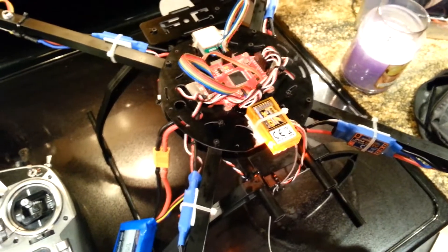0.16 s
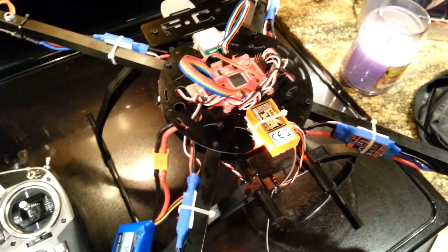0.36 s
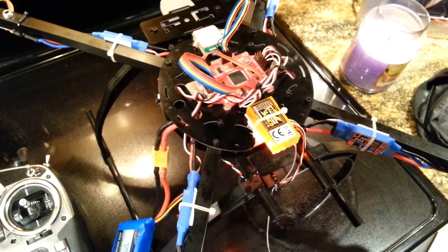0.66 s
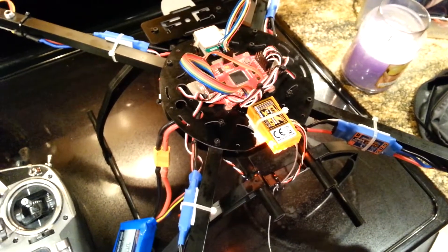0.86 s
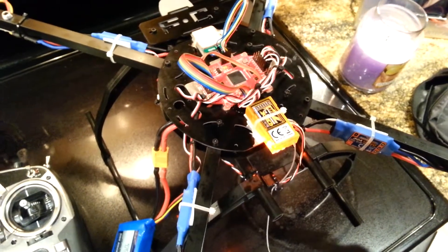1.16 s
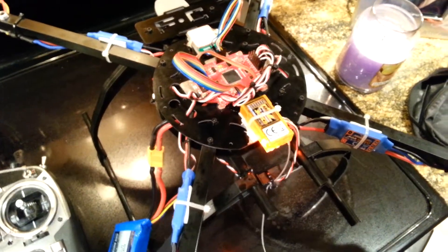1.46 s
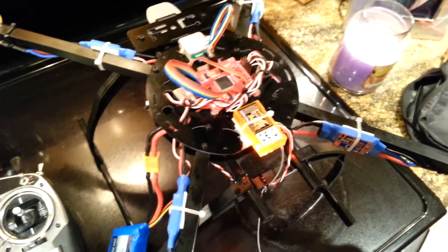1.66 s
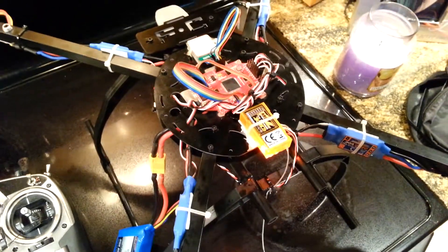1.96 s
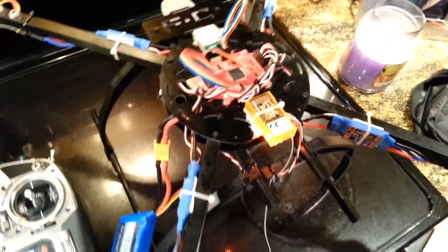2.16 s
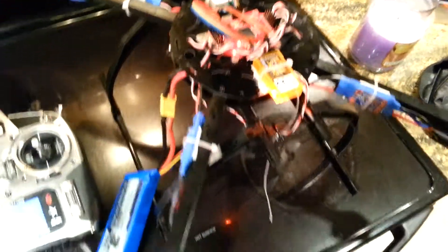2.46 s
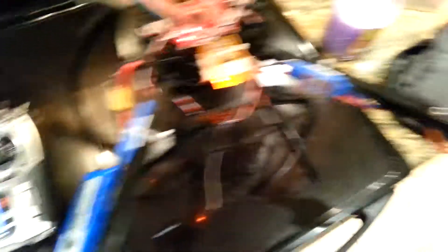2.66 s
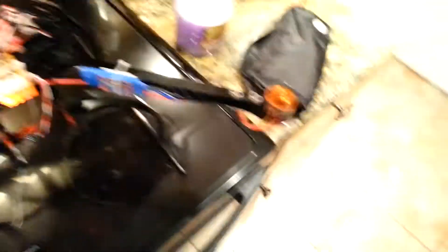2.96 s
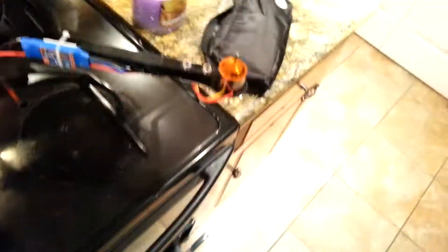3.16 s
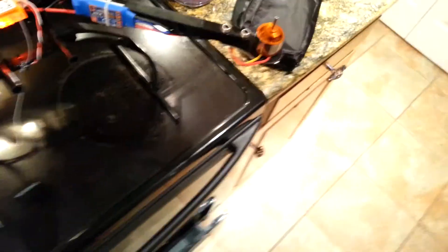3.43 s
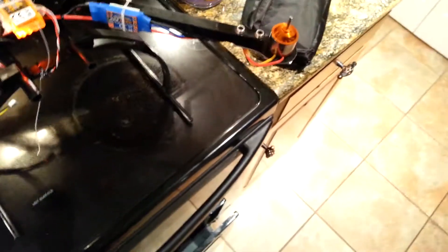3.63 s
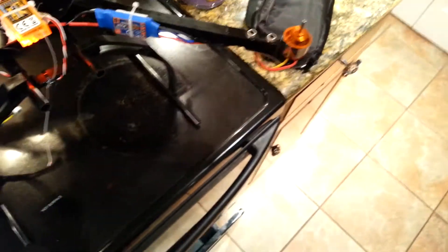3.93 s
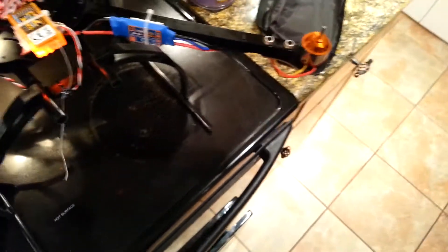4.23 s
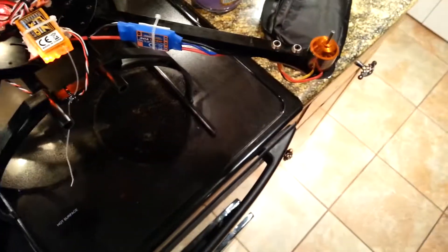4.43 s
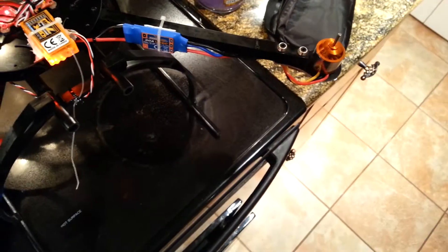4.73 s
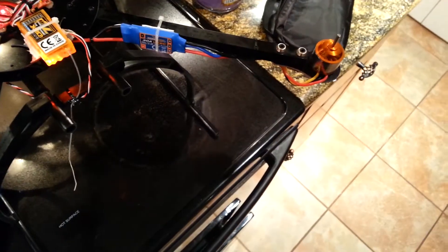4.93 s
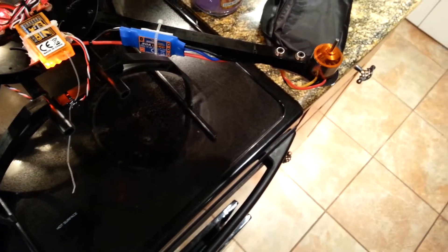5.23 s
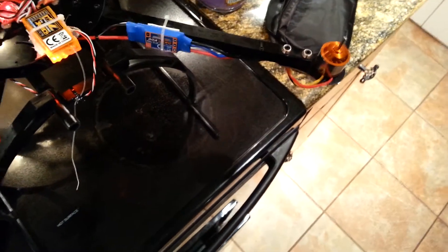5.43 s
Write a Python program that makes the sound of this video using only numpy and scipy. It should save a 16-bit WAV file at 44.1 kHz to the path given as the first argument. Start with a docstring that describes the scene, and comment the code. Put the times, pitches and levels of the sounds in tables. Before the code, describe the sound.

Small bare electric motors spin up and whine at clashing high pitches over a piercing steady squeal, while another stutters and finally joins in.

```python
"""Bare drone motors on a kitchen hob

A quadcopter without propellers is armed on a kitchen hob, heard in stereo from a hand-held microphone.
Three small brushless motors (one steady, one wandering, one climbing) ring the frame at their rotation orders.
The fourth makes false starts, stutters in bursts of knocks and sings along late.
Three controllers' switching tones near 7.7 kHz sag with motor speed and beat; bearing noise hisses below them."""
import sys
import numpy as np
from scipy import signal
from scipy.io import wavfile
from scipy.ndimage import uniform_filter1d

SR = 44100
rng = np.random.default_rng(int(sys.argv[2]) if len(sys.argv) > 2 else 0)


def store_wav(level_fs):
    """Save 16-bit WAV to argv[1]."""
    pcm = np.round(np.clip(np.atleast_2d(level_fs), -1, 1) * 32767)
    wavfile.write(sys.argv[1], SR, pcm.T.astype(np.int16))


N = 246519
TIME = np.arange(N) / SR
MAGNET_PAIRS = 7
STEP = 64  # samples between points of the slower control curves


def from_db(db):
    """Decibels to gain."""
    return 10 ** (np.asarray(db) / 20)


def rms_one(x):
    """Scale to unit rms."""
    return x / np.sqrt(np.mean(x ** 2) + 1e-20)


def in_time(rows):
    """Each column of a timed curve, interpolated at every sample."""
    s, *columns = np.transpose(rows)
    return [np.interp(TIME, s, column) for column in columns]


def at_hz(points, hz):
    """Read a spectrum on a log-frequency axis."""
    points = np.array(points)
    return np.interp(np.log(hz), np.log(points[:, 0]), points[:, 1])


def drift(rate):
    """Smooth random motion of unit rms; a higher rate moves faster."""
    pole = np.exp(-80 * np.pi * rate / SR)
    # computed at every 40th sample, after a run-in of 2000 points
    noise = rng.standard_normal(N // 40 + 2002)
    slow = signal.lfilter([1], [1, -2 * pole, pole * pole], noise)[2000:]
    return np.interp(np.arange(N) / 40, np.arange(len(slow)), rms_one(slow))


def band(x, low, high):
    """Butterworth band-pass."""
    sos = signal.butter(2, [low, min(high, .45 * SR)], "band", fs=SR, output="sos")
    return signal.sosfilt(sos, x)


def angle(hz):
    """Running phase [rad] of a frequency curve."""
    return 2 * np.pi * np.cumsum(hz) / SR


def swelling_force(events):
    """Each event rises to its peak half its length after onset, then dies away."""
    force = np.zeros(N)
    for s, db, length in events:
        age = np.maximum(TIME - s, 0) / max(length / 2, 1e-3)
        force += from_db(db) * age * np.exp(1 - age)
    return force


# balance between the microphone's two sides: (frequency [Hz], left minus right [dB])
LEFT_MINUS_RIGHT = [(60, -13), (130, -7), (290, -2), (640, 4), (1410, 5.5), (3100, 6.5), (6820, -2.5),
                    (9500, 4.5), (15000, -4.5)]


def lean(hz):
    """Left and right gains at this pitch."""
    return from_db(at_hz(LEFT_MINUS_RIGHT, hz) * np.array([[.5], [-.5]]))


def partial(phase, gain, hz, fade_db=1.42, fade_rate=2.3):
    """A sine in two ears; room standing waves sway its level and set the ears' phases apart, more in the treble."""
    shortness = min(hz / 2500, 1.1)
    apart = rng.choice([-1, 1]) * rng.uniform(0.62, 1) * shortness
    ears = rng.uniform(0, 2 * np.pi) + np.array([[apart], [-apart]])
    wave = np.sin(((phase % (2 * np.pi)) + ears).astype(np.float32))
    sway = from_db(fade_db * shortness * drift(fade_rate))
    return np.sqrt(2) * gain * sway * lean(hz) * wave


START_SPEED, ROTOR_LAG_S = 60, .15  # turns per s, s
# speed asked of each motor: (time [s], speed [turns per s])
STEADY_ASKED = [(0, 82.3), (5.12, 82.8), (5.18, 85), (5.35, 83)]
WANDERING_ASKED = [(0, 83), (.62, 91.4), (1.2, 93.9), (1.65, 92.1), (2.0, 92.1), (2.93, 85.1), (3.53, 88.1),
                   (4.07, 88.2), (4.64, 84.3), (4.9, 104)]
CLIMBING_ASKED = [(0, 60), (.09, 100), (.3, 103.5), (.41, 110), (1.02, 118), (1.11, 114.2), (1.49, 120),
                  (2.84, 136.3), (4.66, 148.5), (4.8, 161.5), (5.0, 159.5), (5.59, 163.5)]
LATE_ASKED = [(3.05, 80.5), (3.34, 38), (4.27, 39.7), (4.86, 112.5), (5.4, 116), (5.5, 127)]


def spin(throttle):
    """Turns per second: the rotor's inertia makes it trail the throttle."""
    asked, = in_time(throttle)
    keep = np.exp(-1 / (ROTOR_LAG_S * SR))
    return START_SPEED + signal.lfilter([1 - keep], [1, -keep], asked - START_SPEED)


# each motor's loudness: (time [s], relative hum level [dB], relative whine level [dB])
STEADY_LEVELS = [(0, -37, -4), (0.28, 2.5, 7.5), (0.7, -2.5, 3.5), (1.3, -3, 5.5), (2.0, -0.5, 5.5),
                 (2.6, -6.5, 3.5), (3.149, 6, -1), (3.9, 2.5, -6), (4.8, 3.5, -2.5), (5.59, 2, -2.5)]
WANDERING_LEVELS = [(0, 1, -1), (0.25, -9, -5), (0.45, 3, -2.5), (1.0, -2.5, -2), (2.6, 4.5, 0),
                    (3.15, 4, -4), (3.9, 2, -2), (4.65, 5, 2), (4.95, -0.5, 0.5), (5.59, 7, -14)]
CLIMBING_LEVELS = [(0, -5.5, -5), (0.299, 4.5, -1.5), (1.0, 9, 1.5), (1.9, 7.5, 7), (2.6, 11, 4),
                   (3.15, 4.5, 5), (4.5, 7.5, 9), (5.05, 9, 5), (5.59, 10.5, 4.5)]
LATE_LEVELS = [(4.55, -63, -51), (4.75, -11, -23), (5.1, 21.5, 7.5), (5.59, 18, -9)]
# each motor's partials: (multiple of the turning rate [1], relative level [dB])
STEADY_PARTIALS = [(13, -40), (14, -46), (18, -38), (21, -38.5), (28, -45.5), (35, -49.5), (36, -41.5),
                   (42, -31), (52, -54), (56, -53.5), (59, -59.5), (63, -43.5), (70, -41), (73, -50),
                   (84, -55), (136, -69)]
WANDERING_PARTIALS = [(13, -36.5), (14, -51.5), (21, -62), (28, -41), (36, -41.5), (42, -36.5), (45, -54),
                      (49, -46), (52, -45), (53, -53), (56, -45.5), (63, -47.5), (70, -58), (84, -49)]
CLIMBING_PARTIALS = [(1, -86.5), (2, -92), (8, -61), (12, -43.5), (13, -39.5), (14, -40), (21, -39.5),
                     (28, -38.5), (31, -54), (32, -60.5), (35, -55), (37, -50), (42, -39.5), (48, -52.5),
                     (49, -59), (56, -58.5), (63, -53.5), (84, -57)]
LATE_PARTIALS = [(13, -38.5), (14, -45.5), (21, -42), (26, -33.5), (28, -42), (35, -47), (42, -61.5),
                 (49, -45), (56, -49)]
# partials that meet a sharp mode of their arm and sing out, or dip where the boost is negative:
# (multiple of the turning rate [1], time of the extreme [s], width [s], boost [dB])
STEADY_MODES = [(42, 0.17, 0.06, 8.5), (35, 0.18, 0.2, 20), (63, 4.4, 1.9, 13), (36, 3.88, 1.02, 12.5),
                (56, 4.36, 1.45, 18), (73, 4.2, 0.57, 5), (63, 0.22, 0.16, -17), (63, 5.3, 0.11, 8.5),
                (42, 1.56, 0.76, 2)]
WANDERING_MODES = [(56, 0.53, 0.07, 11), (52, 1.177, 0.14, 10), (52, 1.8, 0.5, 7.5), (56, 2.65, 0.19, 8),
                   (56, 4.94, 0.26, 0), (42, 1.5, 0.72, 12), (42, 2.8, 0.25, -2), (42, 5.71, 0.18, 6),
                   (45, 5.25, 0.2, 7), (36, 0.4, 0.34, 15), (49, 3.95, 0.21, 6), (52, 3.7, 0.45, 6)]
CLIMBING_MODES = [(63, 0.12, 0.025, 18.5), (56, 0.15, 0.035, 30), (13, 0.17, 0.067, 10),
                  (37, 0.166, 0.057, 35), (37, 0.56, 0.22, 19), (49, 0.24, 0.14, 28), (28, 0.45, 0.14, 9),
                  (42, 0.5, 0.13, 5), (42, 1.12, 0.4, -21), (13, 2.1, 0.7, 1), (14, 1.3, 1.3, -12),
                  (35, 0.23, 0.15, 14), (35, 2.526, 0.18, 24.5), (35, 3.84, 0.3, 2), (31, 3.4, 0.39, 17),
                  (32, 4.13, 0.48, 23.5), (28, 4.83, 0.07, 15), (1, 4.4, 1.33, 21), (2, 5.16, 0.31, 28),
                  (28, 4.05, 0.23, 4.5), (28, 5.34, 0.37, -9), (31, 5.1, 0.73, -16), (32, 4.2, 0.12, -7),
                  (42, 5.55, 0.2, 2)]
# how well the frame radiates, also used for the mirror partials: (frequency [Hz], relative level [dB])
FRAME_RADIATION = [(110, -38), (160, 13.5), (800, -14), (1150, 0), (1400, -16.5), (2500, -7), (3400, -2.5),
                   (3900, -7.5), (4300, 6.5), (4650, 13.5), (4950, 18), (5400, -9.5), (7000, 8.5),
                   (14500, -4)]


def motor(speed, level_curve, orders, swells, level_db, unsteadiness, strain=0.00701, ripple_db=-58,
          wobble=0.086, flutter_db=0.73, strain_flutter_db=4.5, hum_waver_db=3.0):
    """Magnets and commutation steps ring the frame at multiples of the turning rate; also gives the rotor angle."""
    hum, whine = from_db(in_time(level_curve))
    # the rotor runs roughly while its speed changes
    relative_change = np.abs(np.gradient(speed)) * SR / speed
    pull = np.tanh(uniform_filter1d(relative_change, SR // 10))
    rotor = angle(speed * (1 + (unsteadiness + strain * pull) * drift(35.4)))
    # the bell runs slightly off centre, so the whine throbs once a turn and splits into close lines
    whine = whine * (1 + wobble * np.cos(rotor + drift(7.1)))
    flutter = drift(23)[::STEP]
    # other multiples of the magnet pairs add faint lines: the fine grain of the whine
    named = [order for order, db in orders]
    ripple = [(order, ripple_db - 4 * np.log2(order / 63) + rng.normal(0, 2))
              for order in MAGNET_PAIRS * np.arange(5, 19) if order not in named]
    out = np.zeros((2, N))
    for order, db in list(orders) + ripple:
        hz = order * speed[::STEP]
        boost = sum(up * np.exp(-((TIME[::STEP] - s) / width) ** 2)
                    for swelling, s, width, up in swells if swelling == order)
        # the lowest orders waver; the others flutter as the speed changes, the whine at all times
        if order < MAGNET_PAIRS:
            depth = hum_waver_db
        else:
            depth = flutter_db * (order > 20) + strain_flutter_db * pull[::STEP]
        # each partial reads the flutter from its own starting point
        shaken = depth * np.roll(flutter, rng.integers(len(flutter)))
        radiated_db = level_db + db + boost + shaken + at_hz(FRAME_RADIATION, hz)
        radiated = np.repeat(from_db(radiated_db), STEP)[:N]
        out += partial(order * rotor, radiated * (hum if order < 20 else whine), hz.mean())
    return out, rotor


# the fourth motor's brief false starts and run-downs:
# (onset [s], length [s], first speed [turns per s], last speed [turns per s], relative level [dB])
CHIRPS = [(0.0, .11, 61, 74, -33), (2.03, .13, 67, 77, -35), (2.16, .09, 76, 69, -39),
          (2.31, .1, 71, 57, -41), (2.97, .1, 66, 76, -37)]


def false_starts(orders=((14, -7), (42, 1), (84, -1))):
    """The fourth motor catches for a moment, its orders (multiple, dB) chirping up or running down."""
    out = np.zeros((2, N))
    for s, length, first, last, db in CHIRPS:
        progress = np.clip((TIME - s) / length, 0, 1)
        rotor = angle(first + (last - first) * np.sin(progress * np.pi / 2))
        gain = from_db(db) * np.sqrt(np.abs(np.sin(np.pi * progress)))
        for order, order_db in orders:
            out += partial(order * rotor, gain * from_db(order_db), order * last)
    return out


# bearing noise: (time [s], relative rumble level [dB], relative rattle level [dB], relative hiss level [dB])
BEARING_LEVELS = [(.05, -44.5, -39.5, -32.5), (.14, -45.5, -39.5, -29.5), (.7, -50, -44, -38),
                  (2.1, -47.5, -40.5, -36.5), (2.7, -47, -42.5, -38), (3.9, -47.5, -42, -32),
                  (4.65, -49.5, -40, -34), (5.1, -46, -36, -30.5)]
# spectrum of the rolling noise: (frequency [Hz], relative level per Hz [dB])
ROLLING_COLOUR = [(100, -65), (150, -39.5), (235, -26.5), (295, -30), (370, -28), (470, -28), (590, -34.5),
                  (740, -26), (1050, -21.5), (1630, -23.5), (3380, -16.5), (3900, -17.5), (4710, -9),
                  (5930, -12.5), (7470, -18.5), (9400, -17.5), (11900, -25), (14900, -24)]
# how alike the two sides are, before a fade to nothing at 3 kHz: (frequency [Hz], correlation [1])
LEFT_RIGHT_LIKENESS = [(60, -0.29), (180, 0.53), (550, 0.027), (1650, -0.88), (4970, 0.46), (15000, 0.87)]


def bearings(rotor, rumble_db=-5.5, rattle_db=-2.5, hiss_db=-5.5, patchy_db=2.0, lumpy_db=4.5, throb=0.045):
    """Rolling noise in third octaves; the rattling middle swells once a turn."""
    rumble, rattle, hiss = in_time(BEARING_LEVELS)
    edges = 104 * 2 ** (np.arange(23) / 3)
    white = rng.standard_normal((2, 2, N))
    # each zone's level is set over this range [Hz]
    zones = [(rumble + rumble_db, 200, 900), (rattle + rattle_db, 2000, 2700), (hiss + hiss_db, 5500, 7300)]
    levels = []
    for db, low, high in zones:
        colour_power = np.sum(from_db(at_hz(ROLLING_COLOUR, np.arange(low, high))) ** 2)
        levels.append(db - 10 * np.log10(colour_power))
    swell = 1 + throb * np.cos(rotor + drift(28))
    out = 0
    for k, (low, high) in enumerate(zip(edges, edges[1:])):
        hz = np.sqrt(low * high)
        zone = int(hz > 1000) + int(hz > 4500)
        mid, side = rms_one(band(white[k % 2], low, high))
        alike = np.clip(at_hz(LEFT_RIGHT_LIKENESS, hz) * (1 - hz / 3000), 0, 1)
        uneven_db = (patchy_db if zone else lumpy_db) * drift(10.0)
        gain = np.sqrt(high - low) * from_db(levels[zone] + at_hz(ROLLING_COLOUR, hz) + uneven_db)
        noise = np.sqrt(1 + alike) * mid + np.sqrt(1 - alike) * side * [[1], [-1]]
        out = out + gain * lean(hz) * noise * (swell if zone == 1 else 1)
    return out


def ball_tones(rotor, low_db=-57, high_db=-57, fade_s=3.4):
    """Balls hum at fractional multiples of the turning rate, strongest while the microphone is over that motor."""
    near = np.clip((fade_s - TIME) / .4, .25, 1) * np.clip(TIME / .3, 0, 1)
    low = partial(4.5 * rotor, from_db(low_db), 370)
    high = partial(9.65 * rotor, from_db(high_db), 800)
    return near * (low + high)


# bearing hums of the climbing motor:
# (multiple of the turning rate [1], loudest at [s], width [s], relative level [dB])
CLIMBING_BALL_HUMS = [(4.5, 1.16, 1.7, -57.5), (2.62, 2.6, 0.61, -57), (3.62, 7.76, 2.6, -50.5),
                      (2.62, 5.38, 0.33, -54.5)]


def ball_hums(rotor, waver_db=5.5):
    """Wavering hums of a bearing's balls swell and fade as its motor climbs."""
    out = 0
    for order, s, width, db in CLIMBING_BALL_HUMS:
        gain = from_db(db + waver_db * drift(12.7)) * np.exp(-((TIME - s) / width) ** 2 / 2)
        out = out + partial(order * rotor, gain, 410)
    return out


# switching rates at rest [Hz], the fourth controller's clock running fast; sag [Hz for each turn per s]
IDLE_HZ, LATE_IDLE_HZ, SAG_HZ_PER_SPEED = 7810, 7833, .85


def switching(speed, idle_hz, jitter):
    """Phase of a controller's switching: its rate sags as the motor speeds up, shakier at low speed."""
    steady_phase = angle(idle_hz - SAG_HZ_PER_SPEED * speed)
    return steady_phase + jitter * START_SPEED / speed * drift(45)


SWITCH_ON_S, LATE_ON_S = 0.0575, 2  # when the switching tones set in
# each switching tone at the moving microphone: (time [s], relative left level [dB], relative right level [dB])
STEADY_TONE = [(.06, -16.5, -19), (.38, -10.5, -20), (.78, -22, -21.5), (1.42, -9.5, -24),
               (1.58, -19.5, -24), (1.82, -11, -24.5), (2.54, -12.5, -18.5), (2.62, -23, -24),
               (3.501, -17, -18), (3.58, -10, -42), (4.3, -22.5, -15), (5.59, -54, -64)]
CLIMBING_TONE = [(.14, -25, -19), (.7, -40, -24.5), (2.22, -39, -16), (2.38, -15, -58), (2.78, -23.5, -27),
                 (2.94, -16, -22), (3.18, -38, -37), (3.42, -42, -12.5), (4.06, -19, -29),
                 (4.78, -13.5, -16), (5.59, -32, -15)]
LATE_TONE = [(3.05, -42, -44), (3.69, -27, -22.5), (4.17, -26, -27), (4.25, -18, -23), (4.33, -25.5, -25.5),
             (4.73, -17.5, -18.5), (5.59, -16.5, -31)]


def squeal(phase, loudness, on_s, level_db, port_phase, fade_db=2.5, fade_rate=9.9):
    """The windings sing at the switching rate once powered; standing waves sway each ear's level."""
    powered = np.clip((TIME - on_s) / 0.0011, 0, 1)
    sway_db = fade_db * np.array([drift(fade_rate), drift(fade_rate)])
    ears_db = np.array(in_time(loudness)) + sway_db
    wave = np.sin(phase + np.array([[0], [port_phase]]))  # right side leads by port_phase [rad]
    return np.sqrt(2) * powered * from_db(level_db + ears_db) * wave


MIRRORS_RISE_S = 0.35  # the mirror partials grow as the rotors come up to speed
# mirror partials: (multiple of the switching rate [1], plus this multiple of the turning rate [1],
# relative level [dB], loudest at [s], width [s])
STEADY_SIDEBANDS = [(1, -35, -55, 4.6, 1.4), (1, -21, -46, 2.2, 4), (1, -14, -55, 4.5, 3.6),
                    (1, 14, -60, 3.5, 4.8), (1, 28, -68, 2.5, 4), (1, 42, -60, 2.5, 4),
                    (1, 70, -58, 2.5, 4), (2, -63, -88, 2.5, 4), (2, -42, -43.5, 2.5, 4.7),
                    (2, -21, -52, 2.5, 4), (2, -14, -50, 1, 2)]
WANDERING_SIDEBANDS = [(1, -35, -48, 1.4, 0.94), (1, -21, -56, 2.3, 4), (1, -14, -48, 3.4, 4),
                       (1, 14, -45.5, 3.2, 7.6), (1, 42, -46, 3.6, 4.5), (2, -63, -55, 2.5, 4),
                       (2, -42, -60, 2.5, 4), (2, -21, -58, 2.5, 4), (2, -14, -38, 2.5, 4)]
CLIMBING_SIDEBANDS = [(1, -42, -38.5, 0.83, 1.2), (1, -21, -56, 4.2, 1.8), (1, -14, -43.5, 2.2, 3.2),
                      (1, 14, -42.5, 4.3, 3.8), (1, 35, -63, 2.5, 4), (1, 42, -44.5, 1.3, 3),
                      (2, -63, -53, 2.5, 4), (2, -42, -49, 5.1, 4), (2, -21, -64, 2.5, 4),
                      (2, -14, -44, 2.5, 4.5)]


def sidebands(carrier, rotor, mirrors):
    """Commutation chops the switching tone and its octave into mirror partials that glide with motor speed."""
    out = 0
    for octave, order, db, s, width in mirrors:
        phase = octave * carrier + order * rotor
        hz = np.maximum(np.gradient(phase[::STEP]) * SR / (2 * np.pi * STEP), 1)
        swell = np.exp(-((TIME[::STEP] - s) / width) ** 2 / 2)
        gain = from_db(db + at_hz(FRAME_RADIATION, hz)) * swell
        out = out + partial(phase, np.repeat(gain, STEP)[:N], hz.mean())
    return out * np.clip(TIME / MIRRORS_RISE_S, 0, 1) ** 2


# the fourth motor's kicks: (onset [s], relative peak level [dB], length, twice the rise time [s])
ROTOR_KICKS = [(0.064, -13.5, 0.069), (0.113, -25, 0.048), (0.128, -26, 0.052), (1.873, -12.5, 0.031),
               (2.009, -15.5, 0.075), (2.137, -18.5, 0.081), (2.801, -17, 0.028), (2.94, -13.5, 0.053),
               (3.062, -20, 0.074), (3.156, -19.5, 0.032), (4.67, -17, 0.072)]


def stutter(level_db=-9.0, knocks_per_s=700, ring_db=-2.5, ring_hz=3000):
    """The stalled rotor judders: each kick is a flurry of small knocks in the bell and arm."""
    force = swelling_force(ROTOR_KICKS)
    knocks = (rng.random(N) < knocks_per_s / SR) * rng.uniform(0.61, 1, N)
    age = np.arange(SR // 50) / SR
    arm = rng.standard_normal((2, len(age))) * np.exp(-age / 0.0098)
    shaken = signal.fftconvolve(knocks[None], arm, axes=1)[:, :N]
    broad = rms_one(band(shaken, 1500, 6000))
    ring = rms_one(band(shaken, .75 * ring_hz, 1.3 * ring_hz))
    body = broad + from_db(ring_db) * ring
    return from_db(level_db) * force * rms_one(body) * lean(ring_hz)


# soft bumps of the hand that holds the microphone:
# (onset [s], relative peak level [dB], length, twice the rise time [s])
HAND_BUMPS = [(1.767, -63, 0.044), (2.213, -63, 0.022), (3.192, -57, 0.033)]


def bumps(low_hz=55, high_hz=130):
    """Each bump of the hand on the microphone is a dull swell of low noise."""
    rumble = rms_one(band(rng.standard_normal(N), low_hz, high_hz))
    return swelling_force(HAND_BUMPS) * rumble * lean(low_hz)


KITCHEN_T60_S, KITCHEN_DB = 0.45, -11.5  # decay time, echo level relative to the direct sound


def kitchen(x):
    """The room holds each pitch a moment longer, so gliding whines beat against their own echoes."""
    age = np.arange(SR // 3) / SR
    tail = rng.standard_normal((2, len(age))) * from_db(-60 * age / KITCHEN_T60_S)
    tail = band(tail, 600, 12000)
    tail /= np.sqrt(np.sum(tail ** 2, axis=1, keepdims=True))
    return x + from_db(KITCHEN_DB) * signal.fftconvolve(x, tail, axes=1)[:, :N]


def scene():
    """Motors, controllers and bearings sound together in the kitchen."""
    steady_speed, wandering_speed = spin(STEADY_ASKED), spin(WANDERING_ASKED)
    climbing_speed, late_speed = spin(CLIMBING_ASKED), spin(LATE_ASKED)
    steady, steady_rotor = motor(
        steady_speed, STEADY_LEVELS, STEADY_PARTIALS, STEADY_MODES,
        level_db=-2.0, unsteadiness=0.00045, ripple_db=-64, wobble=0.15)
    wandering, wandering_rotor = motor(
        wandering_speed, WANDERING_LEVELS, WANDERING_PARTIALS, WANDERING_MODES,
        level_db=0.5, unsteadiness=0.0011)
    climbing, climbing_rotor = motor(
        climbing_speed, CLIMBING_LEVELS, CLIMBING_PARTIALS, CLIMBING_MODES,
        level_db=-3.0, unsteadiness=0.00106, ripple_db=-74)
    late, _ = motor(late_speed, LATE_LEVELS, LATE_PARTIALS, [], level_db=-2.0, unsteadiness=0.00904)

    steady_switch = switching(steady_speed, IDLE_HZ, jitter=0.044)
    wandering_switch = switching(wandering_speed, IDLE_HZ, jitter=0.04)
    climbing_switch = switching(climbing_speed, IDLE_HZ, jitter=0.026)
    late_switch = switching(late_speed, LATE_IDLE_HZ, jitter=0.2)
    squeals = squeal(steady_switch, STEADY_TONE, SWITCH_ON_S, level_db=-1.0, port_phase=1.93)
    squeals += squeal(climbing_switch, CLIMBING_TONE, SWITCH_ON_S, level_db=-1.5, port_phase=1.43)
    squeals += squeal(late_switch, LATE_TONE, LATE_ON_S, level_db=4.0, port_phase=0.39)
    mirrors = sidebands(steady_switch, steady_rotor, STEADY_SIDEBANDS)
    mirrors += sidebands(wandering_switch, wandering_rotor, WANDERING_SIDEBANDS)
    mirrors += sidebands(climbing_switch, climbing_rotor, CLIMBING_SIDEBANDS)

    rolling = bearings(climbing_rotor) + ball_tones(steady_rotor) + ball_hums(climbing_rotor)
    motors = steady + wandering + climbing + late
    whines = kitchen(motors + mirrors * (TIME > SWITCH_ON_S) + false_starts())
    return whines + squeals + rolling + stutter() + bumps()


CUTOFF_HZ = 14600


def record(dry):
    """The highest peaks are rounded, the bass is shed and the top is cut."""
    rounded = dry / (1 + (dry / .95) ** 8) ** (1 / 8)
    thin = signal.sosfilt(signal.butter(2, 110, "high", fs=SR, output="sos"), rounded)
    return signal.sosfilt(signal.ellip(10, .1, 80, CUTOFF_HZ, fs=SR, output="sos"), thin)


dry = scene()
out = record(dry)
store_wav(out)
```